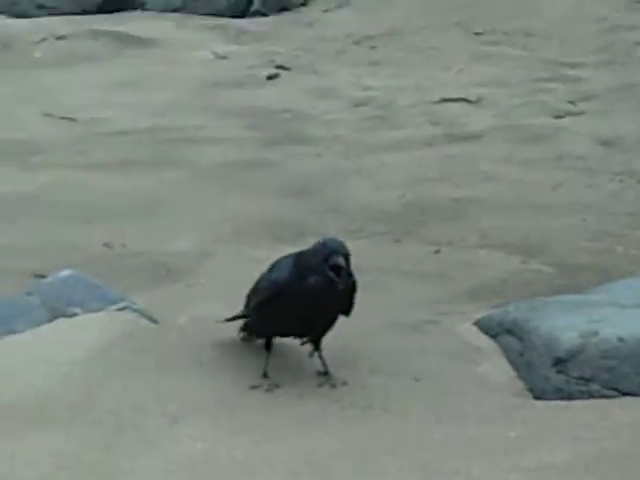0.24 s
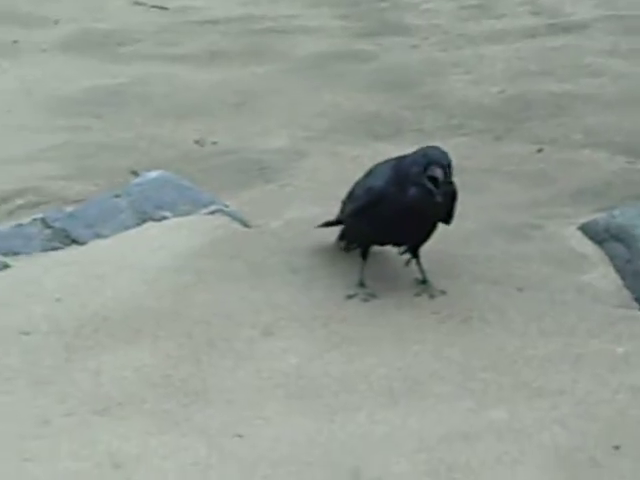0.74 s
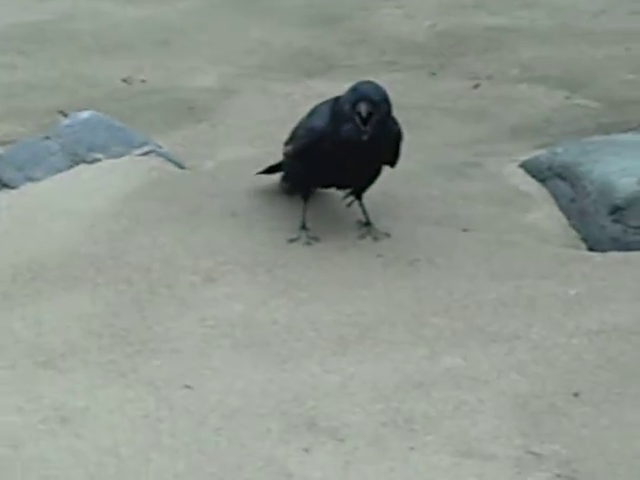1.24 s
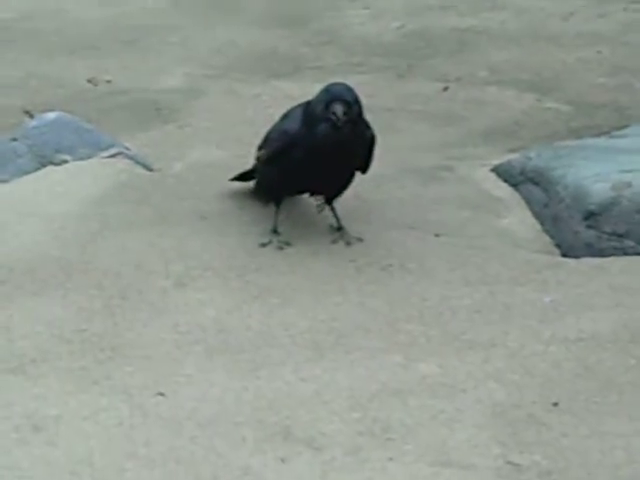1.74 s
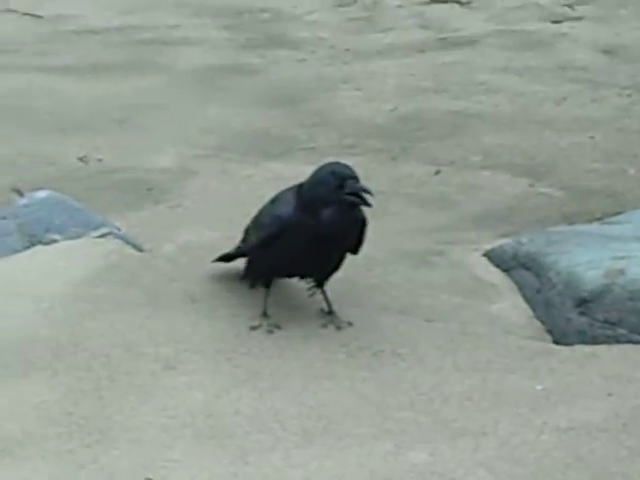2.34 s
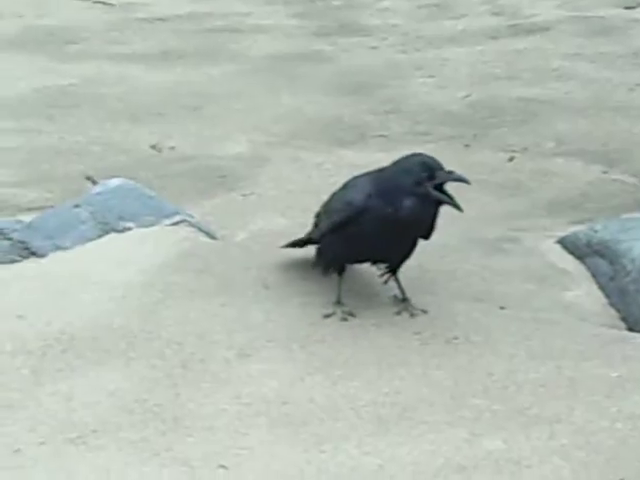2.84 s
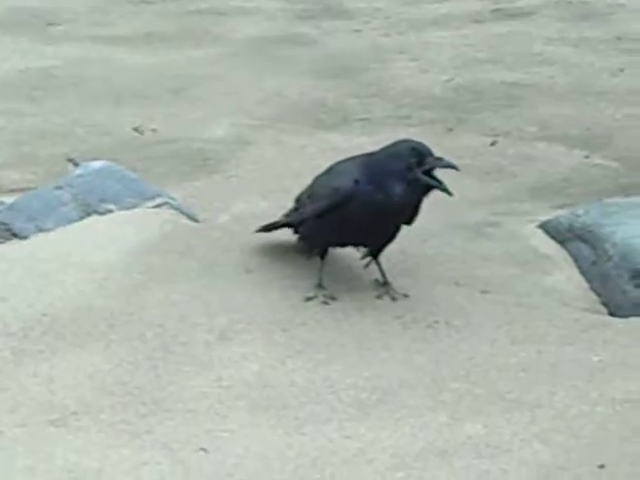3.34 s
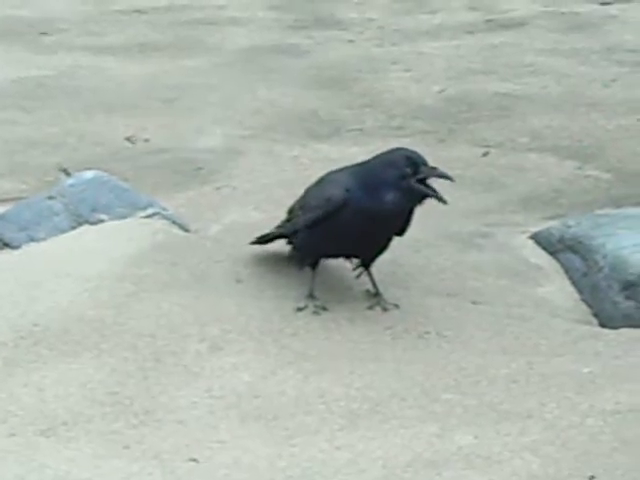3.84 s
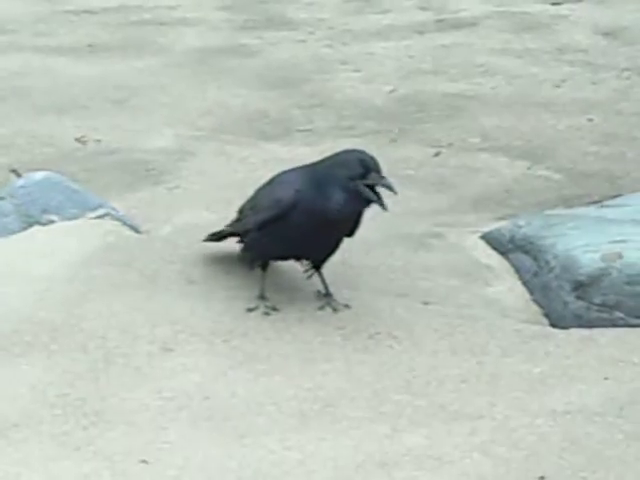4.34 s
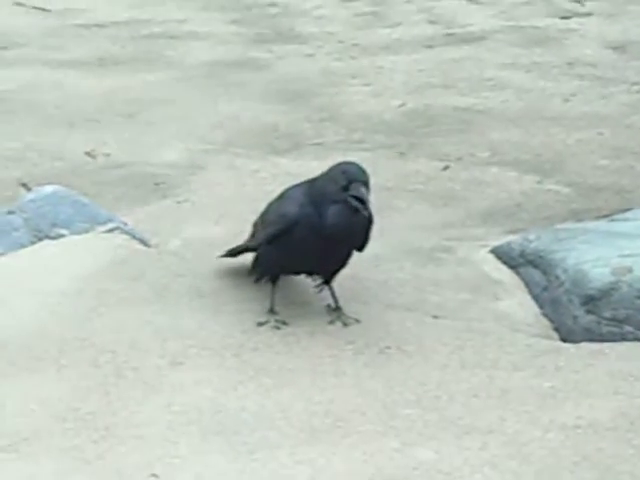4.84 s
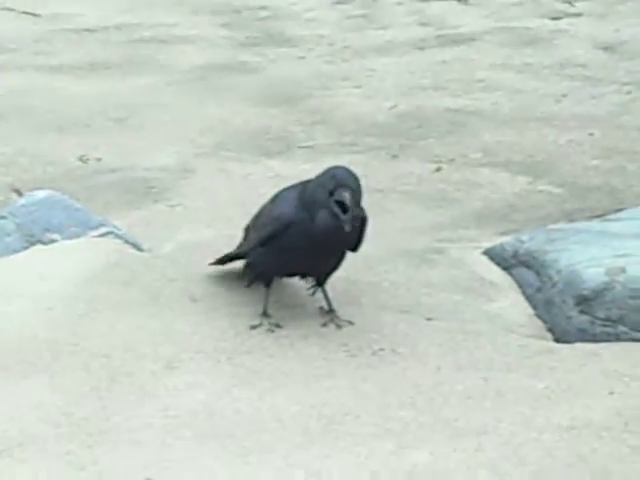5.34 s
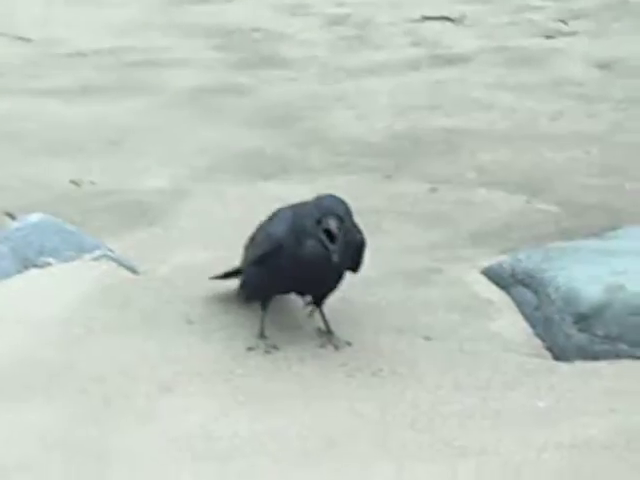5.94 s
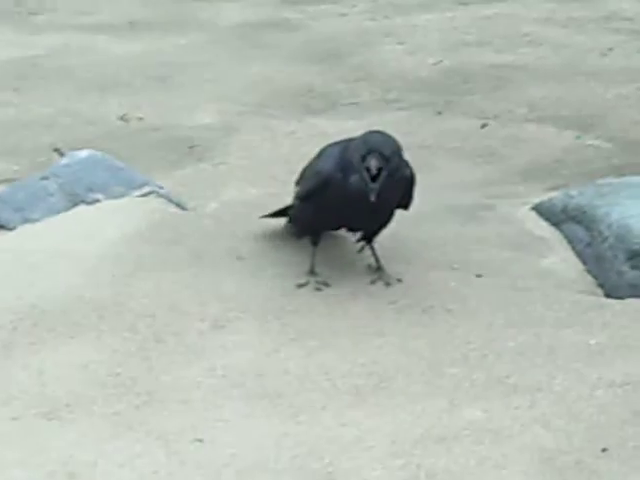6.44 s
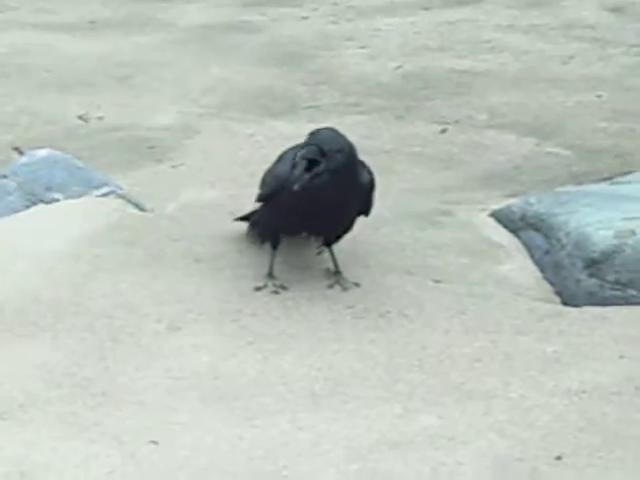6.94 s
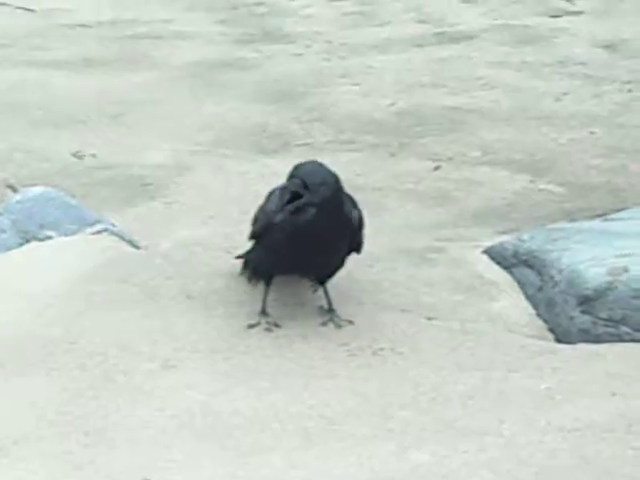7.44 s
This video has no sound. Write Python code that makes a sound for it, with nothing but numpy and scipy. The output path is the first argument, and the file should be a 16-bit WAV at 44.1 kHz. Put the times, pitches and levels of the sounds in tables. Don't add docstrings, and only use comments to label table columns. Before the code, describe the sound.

Outdoors by the sea, a large black bird croaks again and again, sixteen gravelly, nasal calls of about a quarter second with short gaps. The eighth is tighter and buzzier. Surf swells and withdraws faintly behind, and sudden wind thumps hit the microphone, mostly early and at the end. Dull treble, no echo, loud throbs crunching with distortion.

```python
import sys
import numpy as np
from scipy import signal
from scipy.io import wavfile
from scipy.ndimage import uniform_filter1d

SR = 44100
rng = np.random.default_rng(int(sys.argv[2]) if len(sys.argv) > 2 else 0)


def digitize_waveform(pressure):
    field = np.atleast_2d(pressure).T
    bounded = np.clip(field, -1, 1)
    quanta = np.round(bounded * 32767).astype(np.int16)
    wavfile.write(sys.argv[1], SR, quanta)


def gain_from_db(level_db):
    decades = np.asarray(level_db, float) / 20
    return 10 ** decades


N = 338247

# time in seconds, level in dB.
SURF_LEVEL = [
    (0.0, -26.5),
    (2.0, -24.5),
    (3.3, -28),
    (4.44, -29),
    (5.4, -26.5),
    (6.7, -25.5),
    (7.67, -26.5),
]
# frequency in Hz, spectral density in dB per Hz.
SURF_SPECTRUM = [(60, -16), (200, -7), (400, -5), (900, -5), (1400, -8), (2500, -8), (3400, -10.5),
                 (4500, -12.5)]
# time in seconds, gust level in dB.
GUSTS = [(0.0, -28.5), (1.3, -42), (1.69, -18.5), (2.09, -30), (2.16, -24.5), (2.31, -34), (4.44, -31.5),
         (4.64, -14.5), (4.68, -32), (5.96, -33), (6.02, -22), (6.73, -37.5), (7.05, -12), (7.35, -50),
         (7.48, -11), (7.67, -35.5)]
# centre in seconds, peak in dB, frequency in Hz.
AIR_SLAPS = [(0.033, -5, 214), (1.537, -13, 130), (1.592, -10, 200), (1.633, -3.5, 307), (1.665, -4.5, 352),
             (1.679, -7, 245), (1.695, -12, 250), (1.757, -28, 150), (1.77, -3.5, 357), (1.84, 2, 242),
             (1.852, -9.5, 457), (2.125, -13.5, 207), (2.166, -12.5, 200), (4.529, -6.5, 151),
             (4.587, -7.5, 248), (4.608, -4.5, 513), (4.627, -20, 153), (4.639, -10, 149), (7.02, -4, 300),
             (7.042, -14, 250), (7.056, -6, 200), (7.09, -7, 353), (7.104, -4, 497), (7.45, -11, 184),
             (7.468, -6.5, 179), (7.494, -10, 199)]
# start in seconds, end in seconds, top pitch in Hz, final fall in Hz, upper throat ring in dB.
CAWS = [(-.1, 0.099, 524, 90, 4.5), (0.288, 0.562, 514, 70, -3), (0.794, 1.052, 506, 90, 2),
        (1.282, 1.511, 519.4, 90, 4), (1.875, 2.129, 516, 170, 1.5), (2.403, 2.648, 529.5, 150, 1),
        (2.84, 3.07, 499.3, 120, 2.5), (3.238, 3.522, 529, 13, -9.5), (3.819, 4.055, 498, 19, -2.5),
        (4.389, 4.589, 494, 85, 1), (4.975, 5.214, 494.7, 130, 0), (5.504, 5.702, 539, 120, 4.5),
        (5.92, 6.173, 473.5, 53, 2), (6.368, 6.586, 490, 70, 1.2), (6.798, 7.017, 513, 100, 1.5),
        (7.372, 7.578, 535, 190, 2.5)]
# first throb in seconds, last throb in seconds, number of throbs,
# slowing from 0 to 1, longest throb in ms.
RATTLES = [(0.003, 0.077, 5, .15, 13), (0.356, 0.526, 11, .25, 5.8), (0.869, 1.024, 10, 0.15, 14),
           (1.349, 1.474, 8, 0.31, 17), (1.91, 2.08, 12, 0.33, 13), (2.5, 2.616, 9, 0.38, 11),
           (2.919, 3.037, 9, 0.62, 12), (3.299, 3.483, 13, 0.02, 4.44), (3.883, 4.032, 9, 0.45, 12),
           (4.432, 4.565, 9, 0.33, 13), (5.019, 5.177, 11, .3, 14.5), (5.545, 5.668, 9, 0.47, 14),
           (5.992, 6.151, 11, 0.34, 12), (6.429, 6.551, 8, 0.24, 16), (6.844, 7, 10, 0.37, 11),
           (7.439, 7.541, 8, 0.5, 9.4)]
# time in seconds, level in dB.
VOICE_TICKS = [(.092, -6.5), (0.286, 3.5), (1.039, 9), (1.287, -1.5), (2.105, 8), (2.41, 0.5), (3.056, 3.5),
               (3.25, -15), (4.361, -1.5), (4.945, -8), (5.202, 9), (5.689, -6), (5.946, 1.5), (7.561, 0)]
# frequency in Hz, bandwidth in Hz, level in dB.
VOCAL_TRACT = [
    (1438, 351, -2),
    (2040, 166, -4),
    (2806, 710, -8.5),
    (4010, 230, -29),
]
MISFIRES_S = (.415, .527, 3.328, 3.436, 4.033, 6.447, 6.875)

SWELL_DB, SWELL_SHARE, FADE_DB, FADE_SHARE = -7, 0.11, -3, 0.086


def rms_one(x):
    return x / np.sqrt(np.mean(x ** 2) + 1e-20)


def in_time(rows):
    s, *columns = np.transpose(rows)
    return [np.interp(np.arange(N) / SR, s, column) for column in columns]


def drift(rate_hz):
    r = np.exp(-2 * np.pi * rate_hz / SR)
    noise = rng.standard_normal(N + SR)
    return rms_one(signal.lfilter([1], [1, -2 * r, r * r], noise)[SR:])


def band(x, low_hz, high_hz, order=2):
    return signal.sosfilt(signal.butter(order, [low_hz, high_hz], "band", fs=SR, output="sos"), x)


def surf():
    edges_hz = 50 * 2 ** np.arange(0, 7, .5)
    white = rng.standard_normal((2, N))
    hz, density_db = np.transpose(SURF_SPECTRUM)
    sway_db = .8 * drift(0.91)
    out = 0
    for k, (low, high) in enumerate(zip(edges_hz, edges_hz[1:])):
        level_db = np.interp(np.log(low * high) / 2, np.log(hz), density_db)
        flicker_db = 1.3 * drift(39)
        out = out + gain_from_db(level_db + sway_db + flicker_db) * band(white[k % 2], low, high)
    level_db, = in_time(SURF_LEVEL)
    return gain_from_db(level_db) * out / np.std(band(out, 900, 4800))


def turbulence():
    gust_db, = in_time(GUSTS)
    buffet_db = -30.5 + 0.95 * (gust_db + 28)
    rumble = rms_one(band(rng.standard_normal(N), 5.3, 87) * gain_from_db(3.5 * drift(23)))
    small_eddies = band(band(rng.standard_normal(N), 90, 360, order=1), 90, 980)
    buffet = rms_one(small_eddies * gain_from_db(5.1 * drift(36)))
    return gain_from_db(gust_db) * rumble + gain_from_db(buffet_db) * buffet


def slaps():
    shortness, half = 1.6, 800
    t = np.arange(-half, half) / SR
    out = np.zeros(N)
    for s, peak_db, body_hz in AIR_SLAPS:
        phase = rng.uniform(0, 2 * np.pi)
        middle = round(s * SR)
        for hz, db in [(body_hz, 0), (2.4 * body_hz, -10)]:
            pulse = np.exp(-(shortness * hz * t) ** 2) * np.cos(2 * np.pi * hz * t + phase)
            out[middle - half:middle + half] += gain_from_db(peak_db + db) * pulse
    return out


def wind():
    return turbulence() + slaps()


def resonance(x, hz, width_hz):
    r = np.exp(-np.pi * width_hz / SR)
    numerator = np.array([1, 0, -1]) * (1 - r * r) / 2
    return signal.lfilter(numerator, [1, -2 * r * np.cos(2 * np.pi * hz / SR), r * r], x)


def tract(source, upper_db, beak_db):
    rings = [gain_from_db(db) * resonance(source, hz, width_hz) for hz, width_hz, db in VOCAL_TRACT]
    out = rings[0] - gain_from_db(upper_db) * rings[1] + gain_from_db(beak_db) * (rings[2] - rings[3])
    return band(out, 1200, 7800, order=3)


def throbs():
    short_ms, run_up_s, run_up_loss_db = 3.9, .013, 13.0
    rows = [(s, 2.6, db) for s, db in VOICE_TICKS]
    for first, last, count, slowing, longest_ms in RATTLES:
        way = np.linspace(0, 1, round(count))
        s = first + (last - first) * (way + slowing * way ** 2) / (1 + slowing)
        ms = np.interp(way, [0, .75, .93, 1], [short_ms, longest_ms, longest_ms, 0.76 * longest_ms])
        if first < .1:
            ms[:-1] = longest_ms
        else:
            rows += [(first - k * run_up_s, short_ms, -k * run_up_loss_db) for k in (1, 2)]
        db = -.2 * ms + 2.2 * rng.standard_normal(len(s))
        weak = [np.argmin(abs(s - m)) for m in MISFIRES_S if first < m < last + run_up_s]
        db[np.isin(np.arange(len(s)), weak)] -= 11
        rows += zip(s, ms, db)
    return rows


def caw_curve(caw, rattle):
    start, end, top_hz, fall_hz, upper_db = caw
    way = np.linspace(0, 1, 21)
    effort = [SWELL_DB, 0, 0, FADE_DB]
    effort_db = np.interp(way, [0, SWELL_SHARE, 1 - FADE_SHARE, 1], effort)
    pitch_hz = top_hz - np.interp(way, [0, 0.6, 1], [12, 0, fall_hz])
    breath_db = -19 + effort_db + .2 * (rattle[-1] - 10)
    opening_db = .7 * np.interp(way, [0, 0.61, 1 - FADE_SHARE, 1], effort)
    beak_db = -2.5 + np.interp(way, [0, 1 - FADE_SHARE, 1], [0, 0, -15])
    return np.transpose([start + way * (end - start), pitch_hz, breath_db, upper_db + opening_db, beak_db])


def syrinx(pitch_hz):
    sag_per_s, jitter, rough = 14.0, .006, .45
    attack_s, release_s = .0003, 0.0025
    wobbling_hz = pitch_hz * (1 + jitter * drift(320))
    hiss = rng.standard_normal(N)
    out = np.full(N, 1e-18)
    for s, length_ms, level_db in throbs():
        start = round(s * SR)
        size = round(max(length_ms - .8, .6) * SR / 1000)
        span = slice(start, start + size)
        t = np.arange(size) / SR
        sag = 1 + sag_per_s * (t[-1] / 2 - t)
        turns = np.cumsum(wobbling_hz[span] * sag) / SR - .25
        snaps = sum(np.cos(2 * np.pi * k * turns) for k in range(1, 10))
        puffs = rough * hiss[span] * (1 + np.cos(2 * np.pi * turns))
        edges = np.minimum(1, t / attack_s) * np.minimum(1, (t[-1] - t) / release_s)
        out[span] += gain_from_db(level_db) * edges * (snaps + puffs)
    return out


def raven():
    rows = np.vstack([caw_curve(caw, rattle) for caw, rattle in zip(CAWS, RATTLES)])
    pitch_hz, breath_db, upper_db, beak_db = in_time(rows)
    n = np.arange(N)
    calling = sum((n >= caw[0] * SR) & (n < caw[1] * SR) for caw in CAWS)
    gate = uniform_filter1d(calling * 1., size=400)
    voice = tract(syrinx(pitch_hz), upper_db, beak_db)
    leak = rng.standard_normal(N) * gain_from_db(2.5 * drift(70))
    breath = rms_one(tract(leak, upper_db - 10.0, beak_db - 2.5))
    return voice + breath * gain_from_db(breath_db) * gate


def scene():
    return (surf() + wind() + raven())[None]


def roll_off(x):
    return signal.sosfilt(signal.butter(12, 16080, fs=SR, output="sos"), x)


def record(dry):
    soft_top, hard_top, band_edge_hz = .8, .72, 4086
    rounded = dry / (1 + np.abs(dry / soft_top) ** 4) ** .25
    steep = signal.ellip(10, .3, 100, band_edge_hz, fs=SR, output="sos")
    narrow = signal.sosfilt(steep, rounded)
    mix = np.clip(narrow, -hard_top, hard_top) + .002
    return roll_off(mix)


dry = scene()
out = record(dry)
digitize_waveform(out)
```